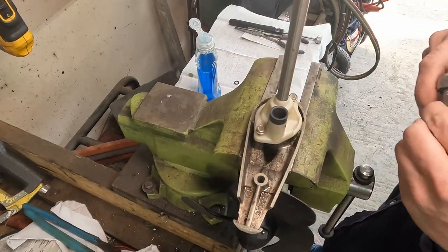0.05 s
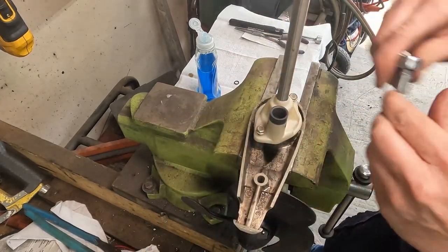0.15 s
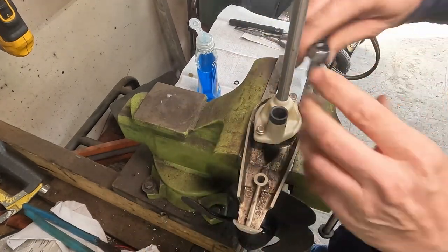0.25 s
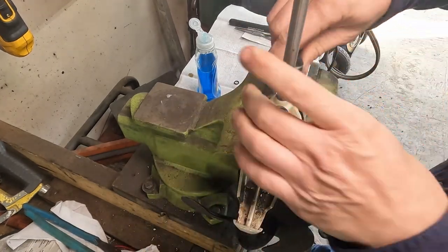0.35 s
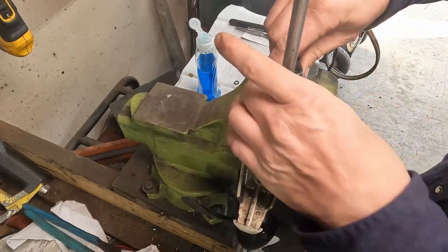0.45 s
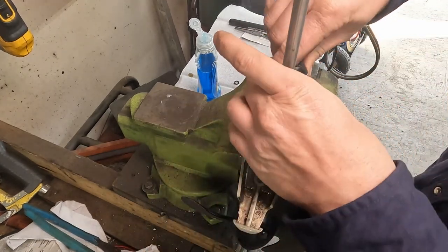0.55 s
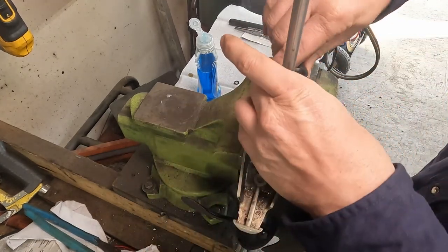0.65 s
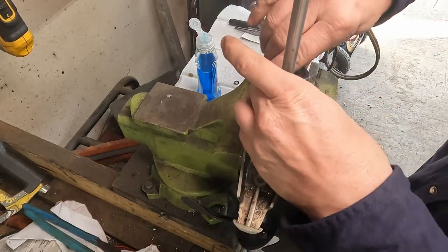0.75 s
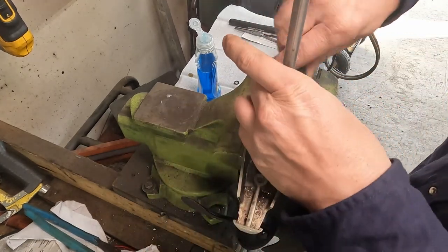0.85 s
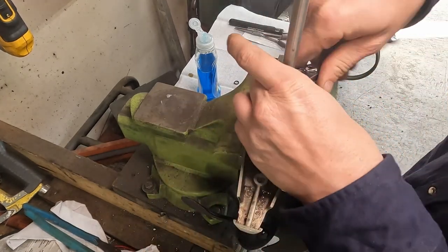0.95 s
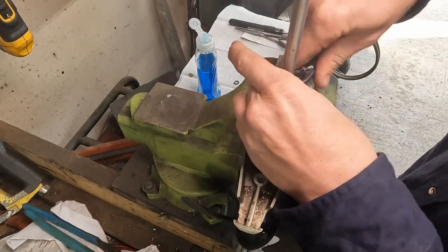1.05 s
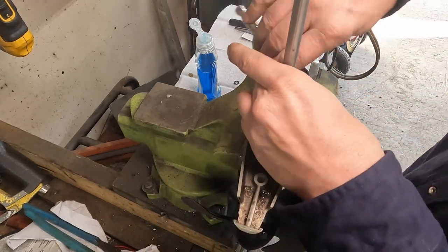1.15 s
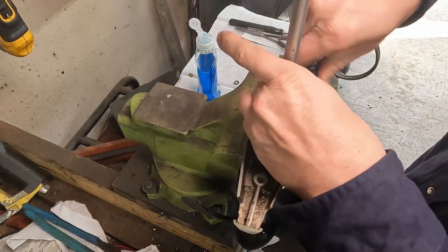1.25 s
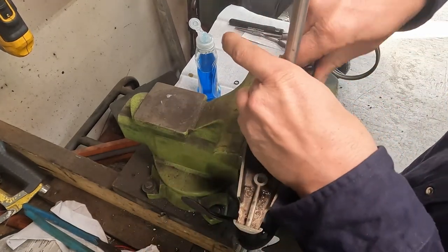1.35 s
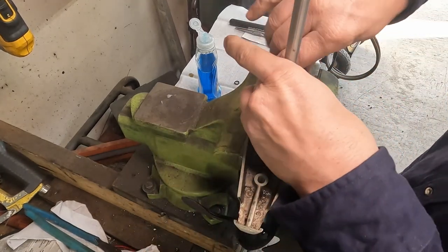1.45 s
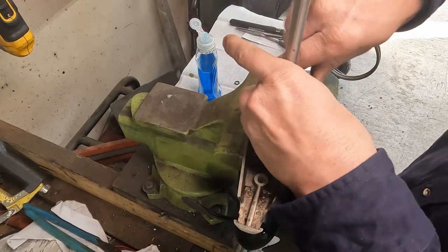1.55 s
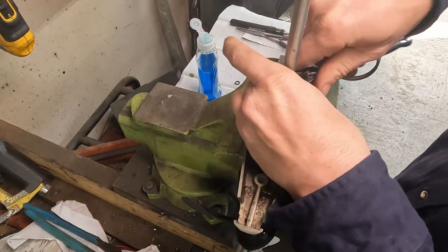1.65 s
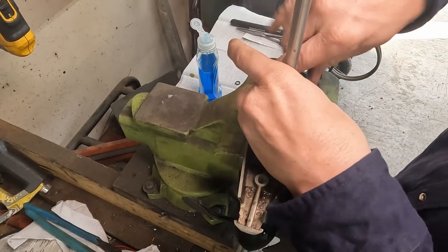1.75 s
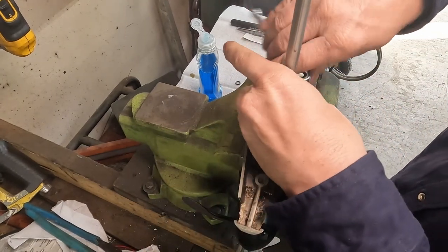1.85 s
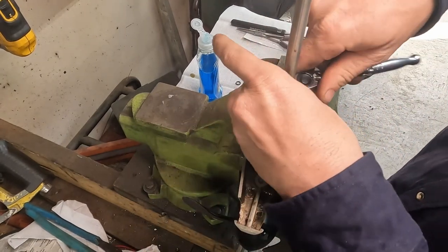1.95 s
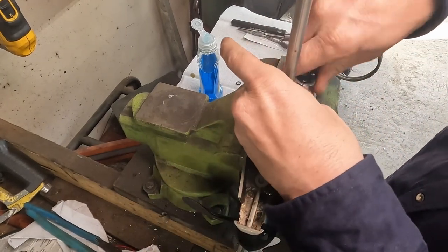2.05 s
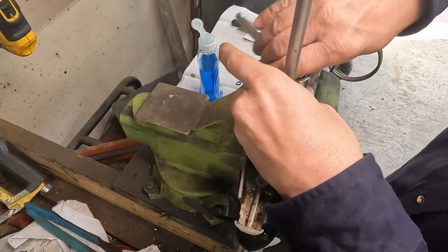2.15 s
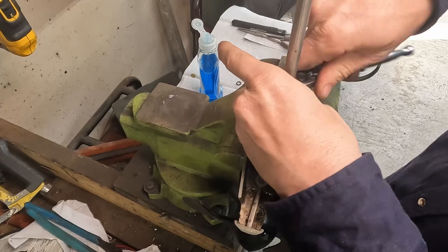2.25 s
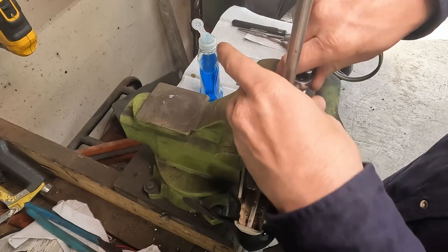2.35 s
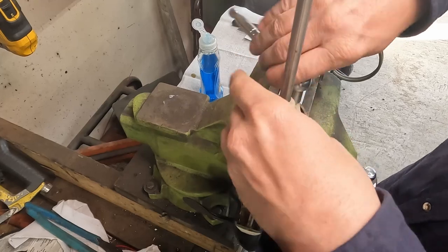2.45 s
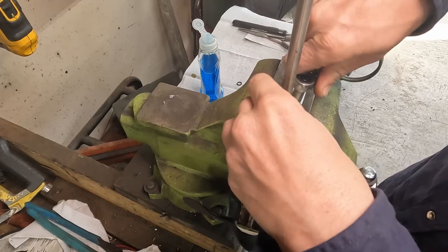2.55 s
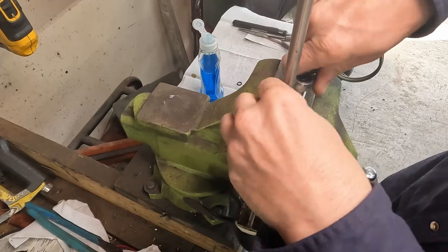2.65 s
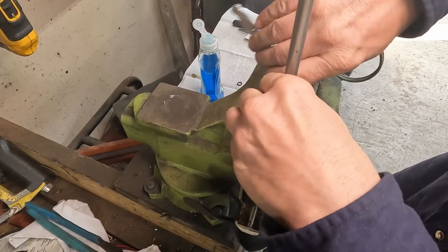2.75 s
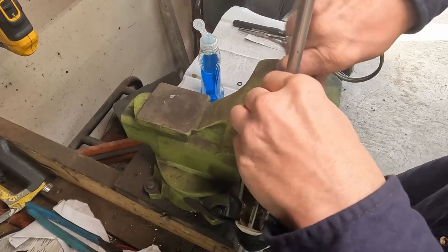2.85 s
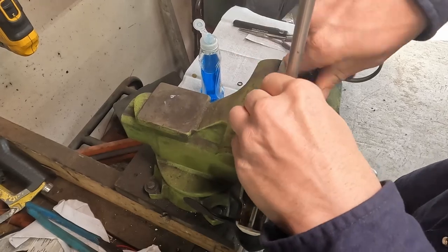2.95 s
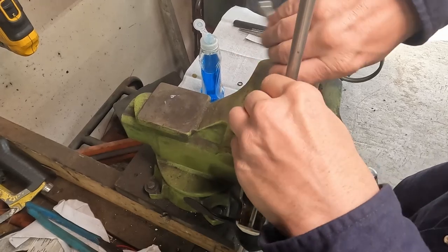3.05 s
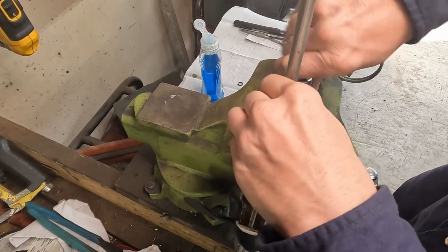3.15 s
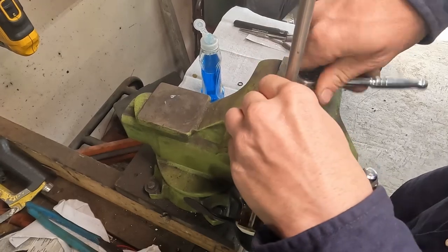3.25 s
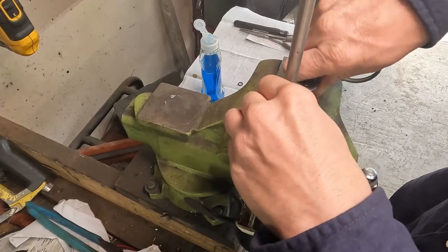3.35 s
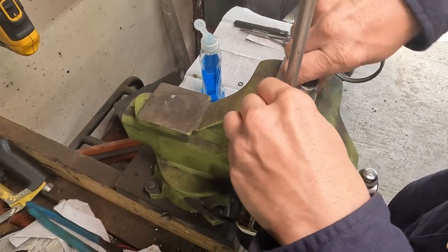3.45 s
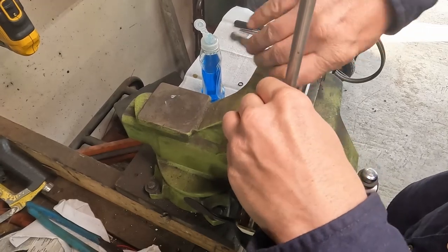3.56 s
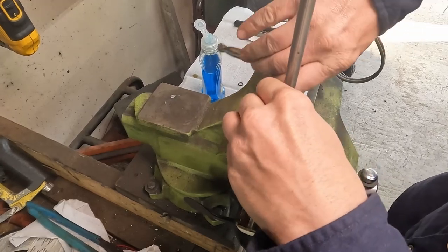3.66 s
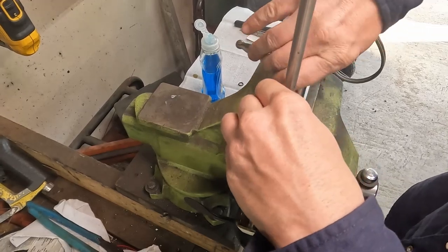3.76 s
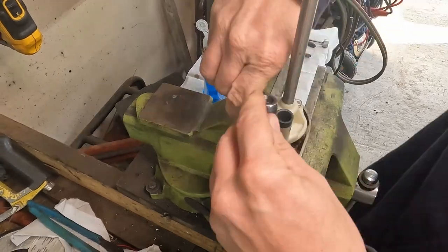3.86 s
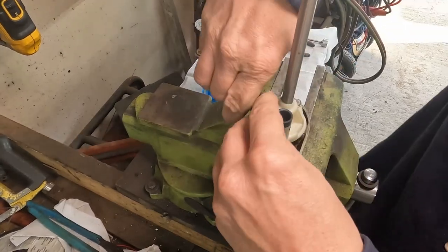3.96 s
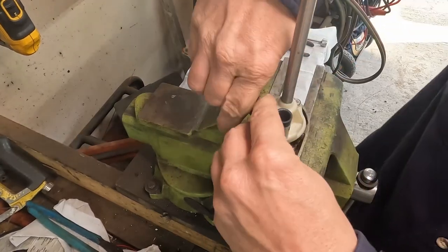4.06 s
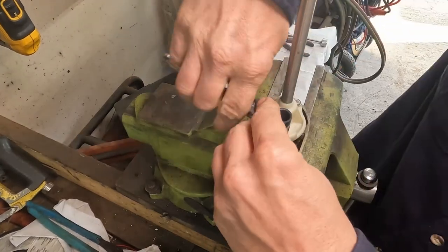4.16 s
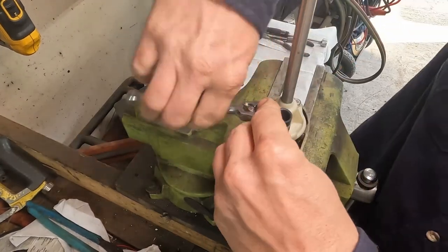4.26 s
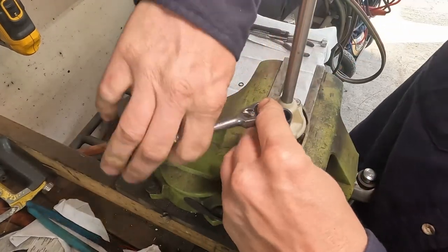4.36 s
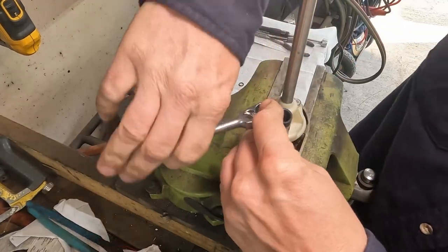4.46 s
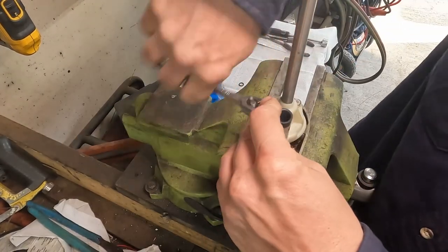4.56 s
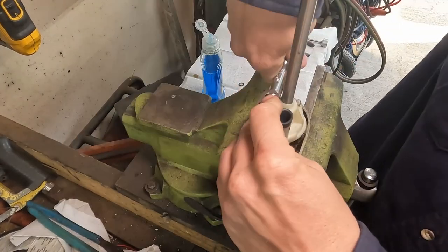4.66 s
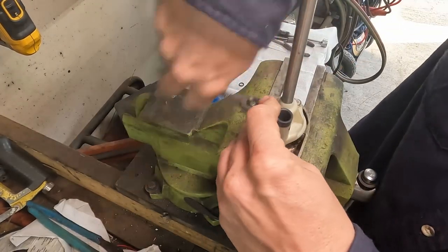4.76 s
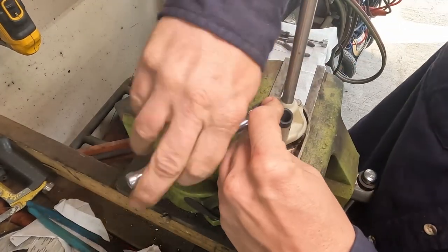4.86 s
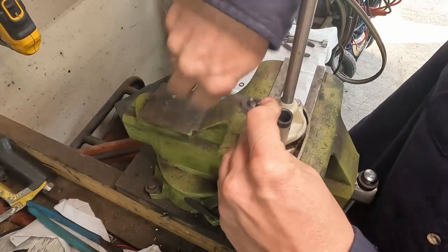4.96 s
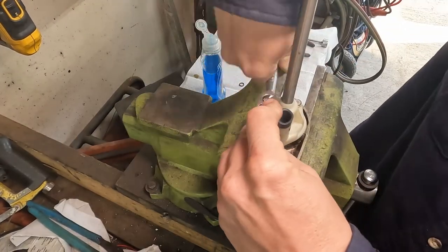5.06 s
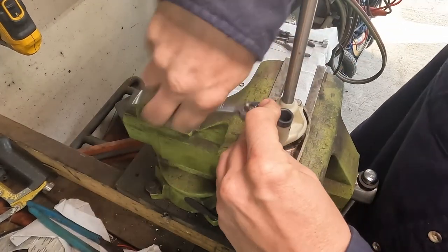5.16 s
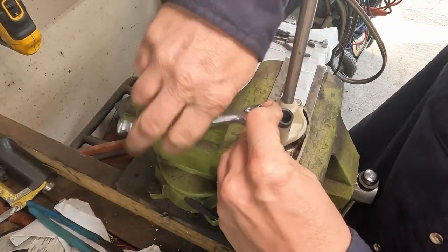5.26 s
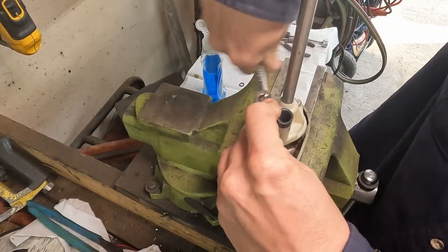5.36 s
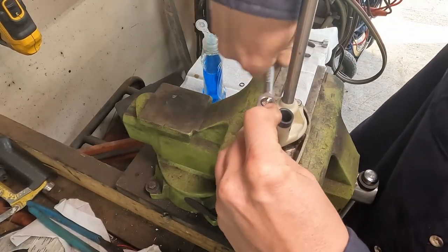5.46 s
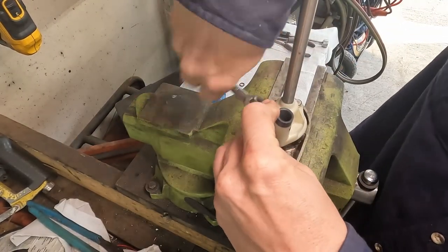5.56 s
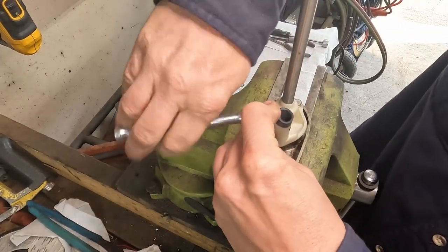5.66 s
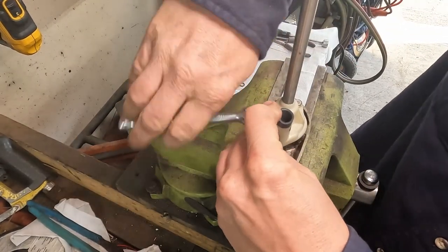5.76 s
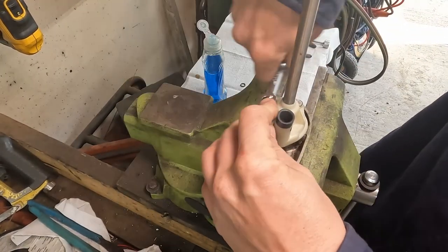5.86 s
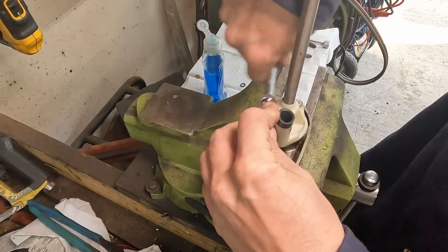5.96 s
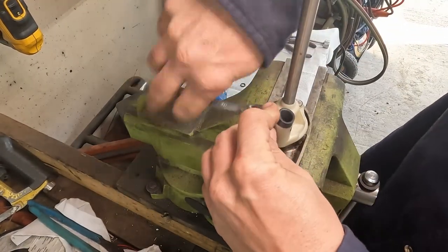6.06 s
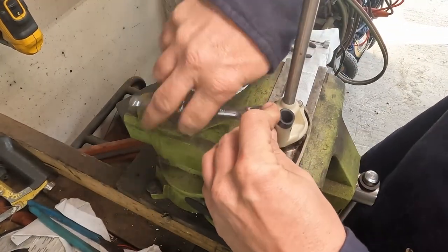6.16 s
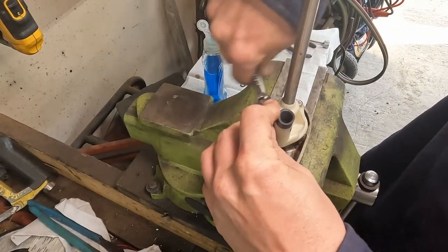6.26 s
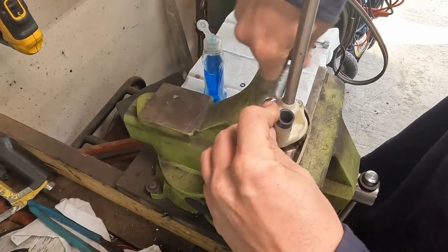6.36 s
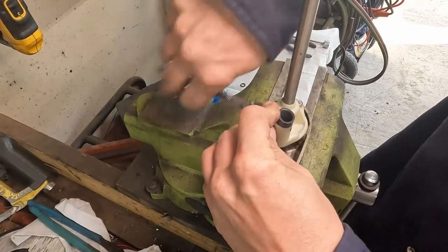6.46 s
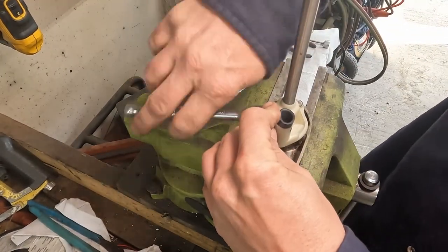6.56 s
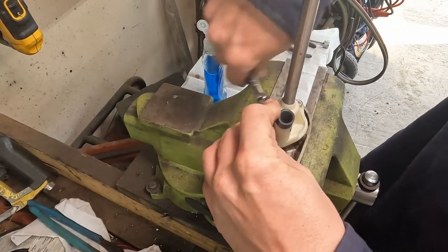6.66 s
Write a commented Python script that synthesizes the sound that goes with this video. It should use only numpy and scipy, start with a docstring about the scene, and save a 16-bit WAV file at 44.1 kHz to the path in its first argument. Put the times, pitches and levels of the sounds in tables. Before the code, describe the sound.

A socket ratchet clinks onto bolts and rattles in short crisp bursts of clicks, with hard metal knocks from a part clamped in a vise.

```python
"""In a garage, close by, a socket ratchet runs down bolts on an outboard motor part held in a bench vise.
On each back swing the pawl snaps over the teeth: trains of clicks coloured by the steel head and the grip.
The socket clinks on the bolt heads as bursts of tiny contacts; the part knocks in the vise as ringing modes.
Tightening pulls make the bench hum, soft thumps are decaying low sines, and hands and sleeves rub as
shaped noise. Quick reflections, a short room tail and quiet garage air surround it all."""
import sys
import numpy as np
from scipy import signal
from scipy.fft import rfft, irfft
from scipy.io import wavfile
from scipy.ndimage import uniform_filter1d

SR = 44100
rng = np.random.default_rng(int(sys.argv[2]) if len(sys.argv) > 2 else 0)


def pcm_store(signal):
    """Save signal as 16-bit PCM."""
    levels = np.round(np.clip(np.atleast_2d(signal), -1, 1) * 32767)
    wavfile.write(sys.argv[1], SR, levels.astype(np.int16).T)


N = 296335

# back swings of the handle:
# (time [s], length [s], teeth passed [count], slow start [-1..1], easing at both ends [0..1])
BACK_SWINGS = [(1.1843, .1317, 23, -.15, .68), (1.5042, .1179, 13, -.1, .58), (1.8439, .1167, 16, .17, .55),
               (2.1898, .0898, 15, -.03, .53), (2.4698, .1276, 17, .03, .82), (2.8124, .0986, 14, -.09, .3),
               (3.1514, .0923, 16, -.15, .43), (3.5725, .0805, 6, .25, .38), (4.3478, .1558, 8, .28, .42),
               (4.8788, .0935, 19, -.11, .35), (5.2867, .0618, 12, -.28, .27), (5.699, .0991, 13, .23, .5),
               (6.1116, .1266, 18, -.14, .4), (6.539, .1081, 17, .05, .3)]
# the grip in each of those swings, how hard the pawl lands and how the hand colours the head:
# (first click [dB], middle click [dB], last click [dB], body [dB], treble [dB],
#  peak [Hz], peak [dB], dip [Hz], dip [dB], room feed [dB])
SWING_GRIPS = [(-13.5, -14, -16.5, -8, -6.5, 2600, 3, 6700, -2.5, -7.5),
               (-18.5, -12.5, -12, 3, -3, 5300, 5, 11700, -5, -6.5),
               (-10, -10, -11.5, -0.5, -7.5, 7000, 4.5, 5940, -5, -7.5),
               (-10, -12.5, -13, 2.5, -5, 3350, 3.5, 2340, -5, -8.5),
               (-12, -11.3, -12, 1, -7.5, 5300, 2.5, 2280, -7.5, -4.5),
               (-11, -12, -18.5, 6, -4.5, 3860, 8.5, 11200, -4, -5.5),
               (-13, -14.5, -18, 5.5, -7, 7650, 5, 2000, -3.5, -5),
               (-15, -12.5, -24, 2, -7.5, 3600, 2, 5370, -10.5, -6.5),
               (-12.5, -8.5, -11, -14, -4, 5950, 7.5, 9100, -9, -12),
               (-10, -10, -11.5, -0.5, 0.5, 5900, 7.5, 6600, -4.5, -13),
               (-8.5, -10.5, -11.5, -7, -0.5, 1800, 5.5, 3300, -5, -14),
               (-10, -10.5, -16, -3.5, 1.5, 9900, 3, 8200, -5.5, -11),
               (-18.5, -16, -14.5, 0, -3, 5100, -3, 3900, -8.5, -10),
               (-22.5, -13, -15, 2, 3.5, 2700, 9, 2870, -9, -12)]
# spectrum of the ratchet head: (frequency [Hz], level [dB])
HEAD_SPECTRUM = [(300, -61), (800, -20), (1400, -15.5), (1900, -12), (2400, -6), (3300, -6), (4200, -3),
                 (5700, -2.5), (7400, -4.5), (8500, -11.5), (9400, -10), (10600, -4.5), (12500, -10.5),
                 (14500, -20), (16000, -40)]
# single clicks and faint ticks of the tool, apart from the trains: (time [s], click energy [dB])
SINGLE_CLICKS = [(1.433, -30), (1.475, -28), (2.441, -32.5), (2.931, -20), (3.271, -18), (4.113, -23),
                 (4.5384, -13.5), (4.617, -33.5), (5.149, -38), (5.4, -32.5), (5.491, -29), (5.624, -15),
                 (5.637, -18), (5.8416, -14), (6.714, -25.5)]
# steel touching steel, socket on bolt:
# (time [s], energy [dB], low clack [dB], socket ring [dB], top [dB], chatter decay [s])
SOCKET_CLINKS = [(0.002, -7.5, -9, 4.5, 7.5, 0.014), (0.532, -5, 2, 21.5, -3, 0.0021),
                 (0.665, -15, 15, -6, -6, 0.015), (0.684, -9, 10, 9.5, -5, 0.009),
                 (0.699, -12.5, 18, 19, 12, 0.004), (0.7787, -13, 3.5, 20, 9, 0.0032),
                 (0.872, -21, 14, 10, -3, 0.0057), (0.8750, -7.5, 6.5, 8, 1, 0.0035),
                 (0.946, -24.5, -9, 26, -4, 0.003), (1.799, -15, -4, 12.5, -6, 0.00091),
                 (2.172, -21, -8, -1, -4, 0.012), (2.756, -15.5, 0.5, 8, -9, 0.0028),
                 (3.3529, -13, -3.5, 11, -0.5, 0.0052), (3.424, -20, 1, 4, -2, 0.0099),
                 (3.4468, -1, -9, 3, -6, 0.0031), (3.4574, -7.5, -9, -22, -11, 0.00095),
                 (3.4623, -5.5, -9.5, -38, -6, 0.0012), (3.469, -14, -21, 4, -8, 0.0021),
                 (3.483, -17, -6, -24, 12, 0.00051), (4.1567, -14.5, 1, -1, -3.5, 0.0025)]
# spectrum of the socket: (frequency [Hz], level [dB])
SOCKET_SPECTRUM = [(300, -26), (900, -9), (1700, -1), (2800, -2), (4000, -3), (4700, -5.5), (6400, -2.5),
                   (7300, -0.5), (8400, -15.5), (11000, -14.5), (15500, -31)]
# the clamped part knocking in the vise: (time [s], energy [dB], slope [dB per octave], grinding decay [s])
VISE_KNOCKS = [(0.535, -18, 0, 0.024), (0.787, -16, 3, 0.0052), (0.875, -13, -4, 0.007),
               (1.797, -19.5, -9, 0.0017), (2.096, -22.5, 3, 0.015), (2.167, -13, -3, 0.01),
               (2.275, -17, -18, 0.0041), (2.46, -22.5, 5, 0.0088), (2.628, -20.5, 3.5, 0.0058),
               (2.756, -22, -4.5, 0.0026), (2.778, -21, 0, 0.0035), (2.964, -21, 3, 0.0091),
               (3.123, -21, 3.5, 0.051), (3.228, -17, 3.5, 0.0019), (3.27, -15, 2, 0.012),
               (3.352, -13.5, -2, 0.0074), (3.38, -16, -1, 0.0036), (3.449, -5.5, -5.5, 0.0017),
               (3.462, -19, -6, 0.0055), (4.158, -26, 11, 0.0044), (4.730, -25, -12.5, 0.0049),
               (4.94, -18.5, 5, 0.0072), (5.235, -16, 0.5, 0.0035), (5.411, -19.5, -5, 0.0061),
               (5.435, -27, -4.5, 0.004), (5.491, -26, -7, 0.0036), (5.558, -27, -6.5, 0.004),
               (5.999, -6, 3, 0.0066), (6.438, -6.5, 2, 0.0057), (6.712, -20.5, 1.5, 0.0067)]
# modes of part and vise: (frequency [Hz], level [dB], t60 [s])
VISE_MODES = [(264, -13, 0.09), (378.6, -1, 0.16), (568, -3.5, 0.13), (688, 5.5, 0.046), (927, -3.5, 0.15),
              (1027, -29.5, 0.11), (1327, 11.5, 0.025), (1502, 5, 0.03), (1753, 6, 0.016),
              (1860, 11, 0.027), (2000, -8, 0.0083), (2650, -4.5, 0.0052)]
# spectrum of the dense clunk between those modes: (frequency [Hz], level [dB])
CLUNK_SPECTRUM = [(120, -2.5), (300, 7.5), (550, -9), (1100, 13), (1700, -24), (2400, 5), (3300, -12.5),
                  (5200, -10.5), (8000, -23.5), (15000, -36)]
# pulls that load the bench as the bolt comes tight: (time [s], time until it dies away [s], level [dB])
TIGHT_PULLS = [(4.903, 0.047, -42), (5.162, 0.2, -42.5), (5.485, 0.88, -46.5), (5.974, 0.15, -39.5),
               (6.252, 0.31, -58), (6.41, 0.3, -42)]
PULL_ATTACK_S, PULL_T60_S = 0.05, 0.083
# modes of the bench: (frequency [Hz], level [dB])
BENCH_MODES = [(79, -1), (104, -12.5)]
# soft thumps of hands and bench: (time [s], level [dB], frequency [Hz], t60 [s])
SOFT_THUMPS = [(0.189, -30.5, 184, 0.044), (0.82, -33.5, 202, 0.044), (0.966, -15, 138, 0.014),
               (1.019, -26, 226, 0.019), (1.129, -41, 97, 0.098), (1.382, -38.5, 119, 0.2),
               (1.892, -34, 125, 0.067), (2.111, -35.5, 121, 0.26), (2.19, -34, 129, 0.072),
               (2.278, -33.5, 118, 0.14), (3.125, -38.5, 317, 0.11), (3.351, -34, 115, 0.19),
               (3.428, -28, 200, 0.056), (3.447, -29, 137, 0.064), (4.075, -41, 49.5, 0.48),
               (5.188, -39.5, 127.5, 0.33), (5.236, -35.5, 277, 0.067), (5.25, -36.5, 120, 0.11),
               (6.003, -21.5, 347, 0.032), (6.024, -29, 118, 0.14), (6.442, -26.5, 317, 0.05),
               (6.479, -27.5, 112, 0.15)]
# low rumble, which swells as the hands shift on the work: (time [s], level [dB])
HANDLING_LEVEL = [(0.0, -79), (0.58, -58.5), (0.73, -58), (0.99, -53.5), (1.31, -50.5), (1.66, -57),
                  (1.98, -51.5), (2.3, -47), (2.98, -55.5), (3.18, -49.5), (3.37, -49.5), (3.67, -47.5),
                  (3.82, -59.5), (4.42, -63.5), (4.96, -58.5), (5.13, -49.5), (6.27, -70), (6.72, -60)]
# spectrum of the handling rumble: (frequency [Hz], level [dB])
RUMBLE_SPECTRUM = [(15, -9.5), (35, 3.5), (60, 4), (115, 1), (170, -2.5), (250, -24), (360, -21),
                   (480, -42.5), (900, -20), (3000, -48)]
# a hand slides to a new grip: (middle time [s], half length [s], level [dB])
GRIP_SLIDES = [(1.03, 0.3, -59.5), (2.55, 0.086, -75), (2.82, 0.077, -54), (3.2, 0.068, -53),
               (3.41, 0.077, -54.5), (3.68, 0.025, -57), (4.18, 0.1, -57.5), (4.54, 0.12, -56),
               (6.17, 0.21, -67)]
# the sleeve brushes along with every swing
SLEEVE_DB, SLEEVE_LAG_S, SLEEVE_HALF_S = -62.5, 0.071, 0.12
# spectrum of the rubbing: (frequency [Hz], level [dB])
RUB_SPECTRUM = [(200, 1), (350, 4.5), (500, -8), (800, -20.5), (1250, 5), (1800, 1), (2800, -16.5),
                (6000, -14), (10000, -30.5), (16000, -45)]
# decay of the garage: (frequency [Hz], t60 [s])
GARAGE_DECAY = [(200, 0.21), (1300, 0.27), (3500, 0.2), (7000, 0.19), (14000, 0.093)]
# spectrum of the still garage: (frequency [Hz], level [dB])
AIR_SPECTRUM = [(20, 2.5), (40, 4.5), (62, -2.5), (85, -17), (120, -13), (220, -10.5), (400, -20),
                (700, -23), (1000, -19.5), (1350, -17.5), (1900, -28), (3300, -35), (6500, -31),
                (9000, -40.5), (14000, -44), (16000, -77)]
# balance of the microphone pair: (frequency [Hz], left minus right [dB])
PORT_BALANCE = [(40, -5), (90, 9), (200, -2), (2500, 0), (8000, 1.5), (14000, 3)]

TAPS = 2048  # length of a short hit, in samples
HZ, AGE = np.fft.rfftfreq(TAPS, 1 / SR), np.arange(TAPS) / SR


def amp(db):
    """Decibels to gain."""
    return 10 ** (np.asarray(db) / 20)


def unit(x):
    """Scales to energy 1."""
    return x / np.sqrt(np.sum(x ** 2) + 1e-20)


def read(points, hz):
    """Reads a (frequency [Hz], value) table on a log axis."""
    f, value = np.transpose(points)
    return np.interp(np.log(hz + 1), np.log(f), value)


def add(mix, s, sound):
    """Mixes a sound in at time s."""
    part = mix[..., max(round(s * SR), 0):][..., :sound.shape[-1]]
    part += sound[..., :part.shape[-1]]


def ringing(db):
    """The causal (minimum phase) impulse response, of energy 1, that has this spectrum."""
    log_gain = np.log(amp(np.r_[db, db[-2:0:-1]]))
    return unit(np.fft.ifft(np.exp(np.conj(signal.hilbert(log_gain)))).real)


def bump(hz, width_hz=500):
    """One broad resonance of height 1."""
    return 1 / (1 + ((HZ - hz) / width_hz) ** 2)


def chatter(decay_s):
    """A dying flurry of tiny contacts, energy 1."""
    return unit(rng.standard_normal(TAPS) * np.exp(-AGE / max(decay_s, 1e-4)))


def noise(spectrum, apart, mono_hz=50):
    """Two channels of coloured noise, rms 1; apart widens them above the deep bass."""
    hz = np.fft.rfftfreq(N, 1 / SR)
    common, side = rfft(rng.standard_normal((2, N)))
    side = side * apart * hz ** 2 / (hz ** 2 + mono_hz ** 2)
    pair = irfft([common + side, common - side] * amp(read(spectrum, hz)), N)
    return unit(pair) * np.sqrt(2 * N)


def waver(count):
    """Slow chance of rms 1, smoothed twice over count samples."""
    once = uniform_filter1d(rng.standard_normal(N), count)
    return unit(uniform_filter1d(once, count)) * np.sqrt(N)


def ratchet():
    """Trains of pawl snaps plus single clicks; returns the near sound and the room feed."""
    near, feed = np.zeros((2, N)), np.zeros(N)
    for swing, grip in zip(BACK_SWINGS, SWING_GRIPS):
        add_swing(near, feed, swing, grip)
    add_single_clicks(near, feed)
    return near, feed


def add_swing(near, feed, swing, grip, scatter_db=1.38, jitter_s=.00012, turn_rad=1.12, pan_db=-1.2):
    """The pawl drops once a tooth as the handle speeds up and slows."""
    s, length, teeth, slow_start, easing = swing
    first_db, middle_db, last_db, body_db, treble_db, peak_hz, peak_db, dip_hz, dip_db, room_db = grip
    arc = np.linspace(0, 1, round(teeth) + 1)  # share of the swing done at each tooth
    slip, force = rng.standard_normal((len(arc), 2)).T
    eased = arc + arc * (1 - arc) * (slow_start + easing * (1 - 2 * arc))
    times = length * eased + jitter_s * slip
    rates = 1 / abs(np.gradient(times))  # teeth per second
    arch = np.polyfit([0, .5, 1], [first_db, middle_db, last_db], 2)
    levels = np.polyval(arch, arc) + scatter_db * force

    first, last, train = steel_ring(), steel_ring(), np.zeros((2, SR // 3))
    for at, rate, level, done in zip(times, rates, levels, arc):
        # the ring shifts as the head turns
        steel = np.cos(turn_rad * done) * first + np.sin(turn_rad * done) * last
        add(train, at, amp(level) * pawl(steel, rate, done))

    colour = np.interp(HZ, [1400, 2400], [body_db, 0]) + np.interp(HZ, [6500, 11000], [0, treble_db])
    colour = colour + peak_db * bump(peak_hz) + dip_db * bump(dip_hz)
    sound = signal.fftconvolve(train, ringing(read(HEAD_SPECTRUM, HZ) + colour)[None])
    add(near, s, sound * amp([[pan_db / 2], [-pan_db / 2]]))
    add(feed, s, sound.mean(0) * amp(room_db))


def add_single_clicks(near, feed, room_db=-8, teeth_per_s=80):
    """Single clicks and faint ticks of the tool, built like a pawl snap without the grip's colour."""
    for s, db in SINGLE_CLICKS:
        click = pawl(steel_ring(), teeth_per_s, .5)
        sound = amp(db) * signal.fftconvolve(click, ringing(read(HEAD_SPECTRUM, HZ))[None])
        add(near, s, sound)
        add(feed, s, sound.mean(0) * amp(room_db))


def pawl(steel, teeth_per_s, done, usual_per_s=130, hurry=0.34, rattle=0.9, rattle_s=0.0017, wide=0.87,
         ring=0.94, note=0.46, note_hz=4900, note_spread=0.238, climb=0.506, note_s=0.0018):
    """The pawl lands and rattles, longer at speed; a brief tooth note climbs through the swing."""
    length, seat = rng.standard_normal(2)
    length_s = rattle_s * (teeth_per_s / usual_per_s) ** hurry * np.exp(length)
    bounce = chatter(length_s) + wide * np.array([chatter(2 * length_s), chatter(2 * length_s)])
    tooth_hz = note_hz * np.exp(note_spread * seat + climb * (done - .5))
    tooth = unit(np.sin(2 * np.pi * tooth_hz * AGE) * np.exp(-AGE / note_s))
    landing = AGE == 0  # a one-sample click
    return unit(landing + rattle * bounce + ring * steel + note * tooth) * np.sqrt(2)


def steel_ring(ring_s=0.002, wide=0.56):
    """The short ring of the head as it reaches the two ports."""
    apart = np.array([chatter(ring_s), chatter(ring_s)])
    return unit(chatter(ring_s) + wide * apart) * np.sqrt(2)


def clinks(tick=0.21, ring_hz=5450, ring_width_hz=600):
    """The socket strikes or scrapes the bolt head and chatters, damped by the fingers."""
    out = np.zeros(N)
    for s, db, clack_db, ring_db, top_db, chatter_s in SOCKET_CLINKS:
        tilt = np.interp(HZ, [2530, 3620, 5560, 7230], [clack_db, 0, 0, top_db])
        colour = tilt + ring_db * bump(ring_hz, ring_width_hz)
        contact = unit(tick * (AGE == 0) + chatter(chatter_s))
        socket = ringing(read(SOCKET_SPECTRUM, HZ) + colour)
        add(out, s, amp(db) * signal.fftconvolve(contact, socket))
    return out


def knocks(grind=2.4, spot_db=2, shift=.02, rise_cycles=0.89, clunk=0.78, pivot_hz=1500):
    """A dense clunk plus the part's modes, varied by where it lands and how the hand presses."""
    out, t = np.zeros(N), np.arange(SR // 4) / SR
    hz, mode_db, t60 = np.transpose(VISE_MODES)[:, :, None]
    for s, db, slope_db, grind_s in VISE_KNOCKS:
        spot, phase, press = rng.standard_normal((3, len(VISE_MODES), 1))
        level = mode_db + spot_db * spot + slope_db * np.log2(hz / pivot_hz) - 60 * t / t60
        swell = 1 - np.exp(-hz * t / rise_cycles)  # low modes build up later
        tones = np.sin(2 * np.pi * (hz * (1 + shift * press) * t + phase))
        body = unit((amp(level) * swell * tones).sum(0))
        clunk_slope = slope_db * np.log2(np.maximum(HZ, 400) / pivot_hz)
        add(body, 0, clunk * ringing(read(CLUNK_SPECTRUM, HZ) + clunk_slope))
        contact = (AGE == 0) + grind * chatter(grind_s)
        add(out, s, amp(db) * unit(signal.fftconvolve(body, contact)))
    return out


def bench(level_db=-1, drift_hz=0.94, lean_db=-2.0):
    """The bench hums at its low modes, pitch drifting a little, while the bolt is pulled tight."""
    level = load() * amp(level_db + np.array([[lean_db], [-lean_db]]))
    hum = np.zeros(N)
    for hz, mode_db in BENCH_MODES:
        cycles = np.cumsum(hz + drift_hz * waver(count=3000)) / SR
        hum += amp(mode_db) * np.sin(2 * np.pi * cycles)
    return level * hum


def load():
    """Strain on the bench: each pull builds up, holds and dies away."""
    t, strain = np.arange(N) / SR, np.zeros(N)
    for s, hold, db in TIGHT_PULLS:
        build = np.clip((t - s) / PULL_ATTACK_S, 0, 1)
        strain += build * amp(db - 60 * np.maximum(t - s - hold, 0) / PULL_T60_S)
    return strain


def thumps(level_db=2, rise_s=0.0044):
    """Soft pushes on the bench: low sines that rise softly and die away."""
    out, t = np.zeros(N), np.arange(SR // 3) / SR
    for s, db, hz, t60 in SOFT_THUMPS:
        fade = amp(db + level_db - 60 * t / max(t60, .01))
        add(out, s, fade * (1 - np.exp(-t / rise_s)) * np.sin(2 * np.pi * hz * t))
    return out


def handling():
    """Both sounds of the hands: the dull rumble and the grainy rub."""
    return hand_rumble() * noise(RUMBLE_SPECTRUM, apart=0.44) + hand_rub() * noise(RUB_SPECTRUM, apart=0.44)


def hand_rumble(rumble_db=3, still_db=-65, late_db=-8, strain_db=-6, surge_db=1):
    """Rumble level: lower in the last second, rising with each pull."""
    t = np.arange(N) / SR
    level_db = np.interp(t, *np.transpose(HANDLING_LEVEL)) + rumble_db
    lowering = np.interp(t, [5.4, 6], [0, late_db])
    shifting = amp(level_db + lowering + surge_db * waver(count=3000))
    return np.hypot(np.maximum(shifting - amp(still_db), 0), amp(strain_db) * load())


def hand_rub(resting_db=-77, grain_db=2, catches_per_s=25, catch=1.96, catch_s=0.0098):
    """Rub level: hand and sleeve strokes with a fine grain, catching now and then."""
    t = np.arange(N) / SR
    sleeves = [(swing[0] + SLEEVE_LAG_S, SLEEVE_HALF_S, SLEEVE_DB) for swing in BACK_SWINGS]
    power = np.full(N, amp(resting_db) ** 2)
    for s, half, db in list(GRIP_SLIDES) + sleeves:
        power += (amp(db) * np.exp(-((t - s) / half) ** 2)) ** 2
    slips = (rng.random(N) < catches_per_s / SR) * np.minimum(rng.exponential(1, N), 2)
    catches = 1 + catch * signal.lfilter([1], [1, -np.exp(-1 / (catch_s * SR))], slips)
    return np.sqrt(power) * amp(grain_db * waver(count=250)) * catches


def garage(x, early_s=0.0028, gap_s=0.0017, alike=0.98):
    """Quick reflections from vise and bench, then the short tail of the room."""
    white = rng.standard_normal((3, SR // 2))
    taps = white[:2] + alike * white[2]
    hz, t, z = signal.stft(taps, SR, nperseg=256)
    decay = amp(-60 * t / read(GARAGE_DECAY, hz)[:, None])  # each band fades at its own pace
    tail = signal.istft(z * decay, SR, nperseg=256)[1][:, :SR // 2]
    age = np.arange(SR // 2) / SR
    close = (white[2] + .5 * white[:2]) * np.exp(-age / early_s)
    onset = np.clip(age / gap_s - 1, 0, 1)  # silent for one gap, full after two
    response = unit((unit(tail) + unit(close)) * onset) * np.sqrt(2)
    return signal.fftconvolve(x[None], response, axes=1)[:, :N]


def garage_air(level_db=-59):
    """The still garage: steady coloured noise, wide above the deep bass."""
    return amp(level_db) * noise(AIR_SPECTRUM, apart=0.6)


def scene(hits_room_db=-8):
    """Tool, work and bench in the garage."""
    near, feed = ratchet()
    hits = clinks() + knocks()
    room = garage(feed + amp(hits_room_db) * hits)
    return near + hits + room + thumps() + bench() + handling() + garage_air()


def record(dry, lag_samples=0.64, edge_hz=15800):
    """Two close microphone ports, the left a little late; then the band limit."""
    hz = np.fft.rfftfreq(N, 1 / SR)
    # half the balance and half the lag go to each side, in opposite directions
    port = amp(read(PORT_BALANCE, hz) / 2) * np.exp(-1j * np.pi * hz * lag_samples / SR)
    pair = irfft(rfft(dry) * np.array([port, 1 / port]), N)
    low_pass = signal.firwin(255, edge_hz, window=("kaiser", 9), fs=SR)
    return signal.oaconvolve(pair, low_pass[None], "same")


dry = scene()
out = record(dry)
pcm_store(out)
```